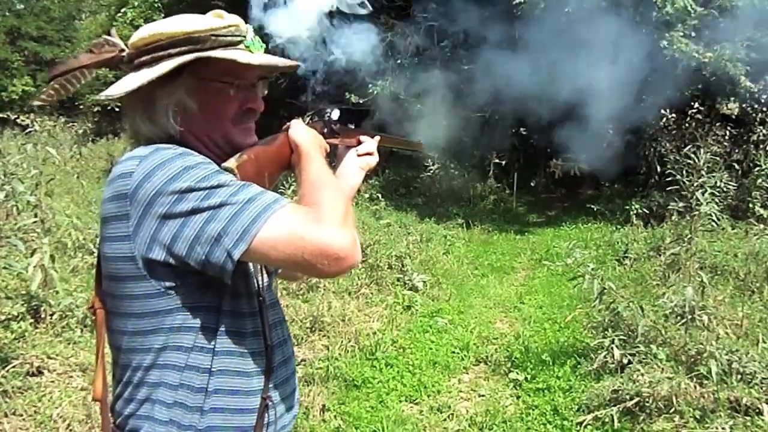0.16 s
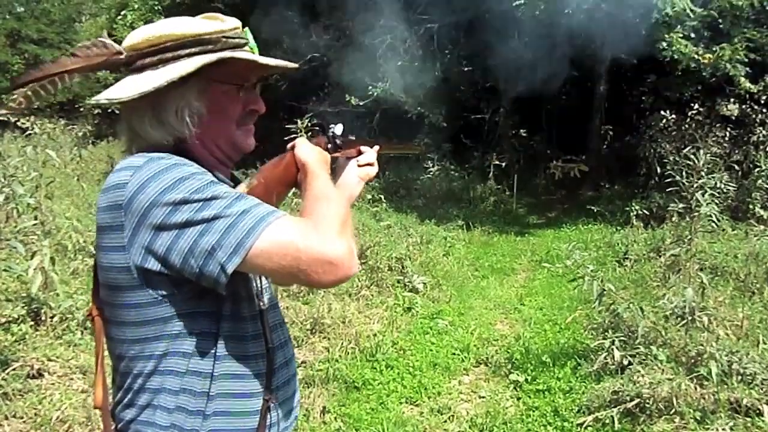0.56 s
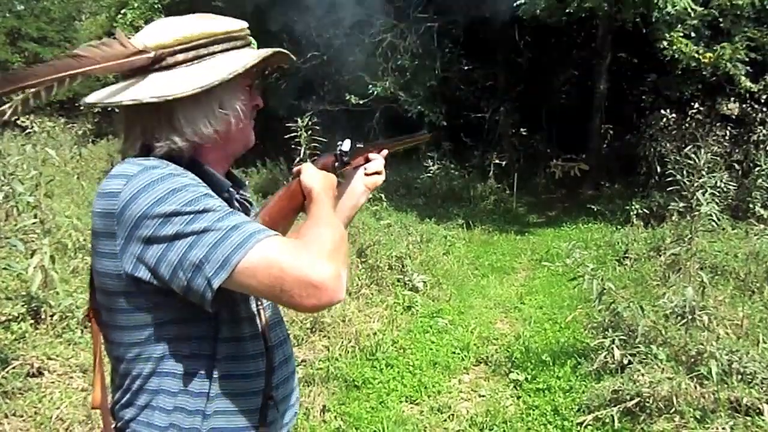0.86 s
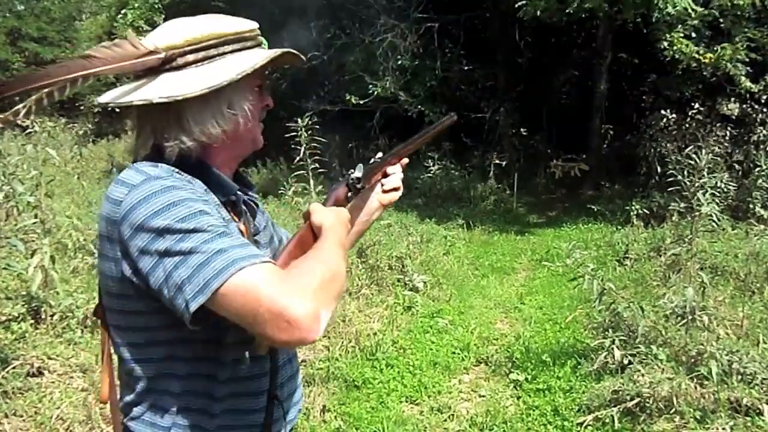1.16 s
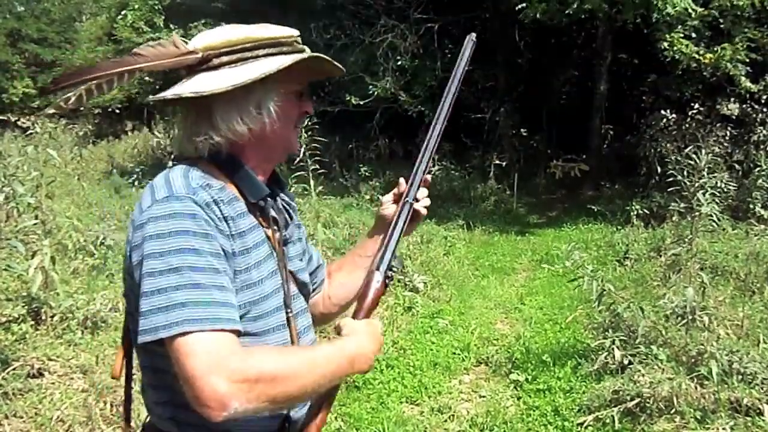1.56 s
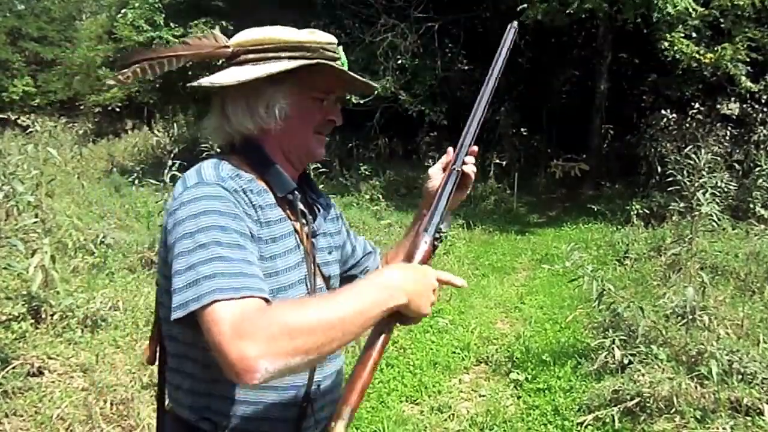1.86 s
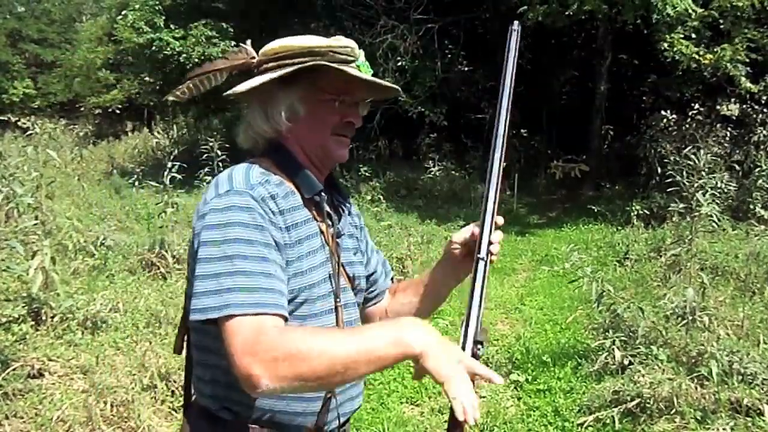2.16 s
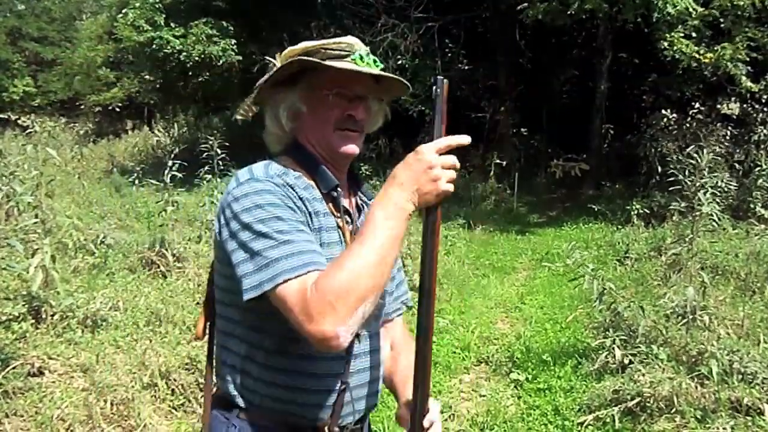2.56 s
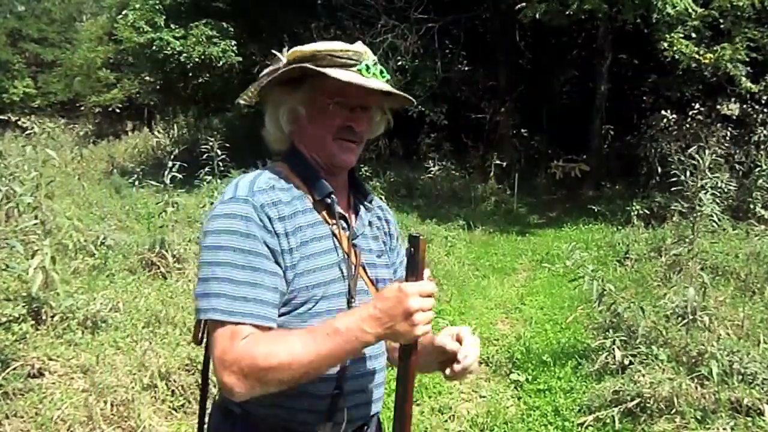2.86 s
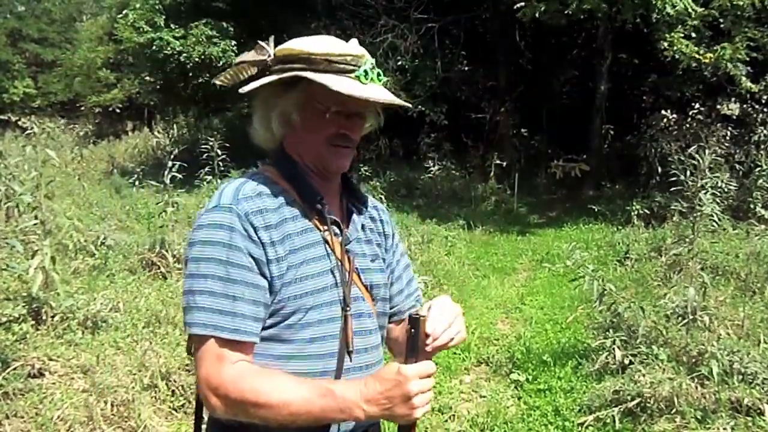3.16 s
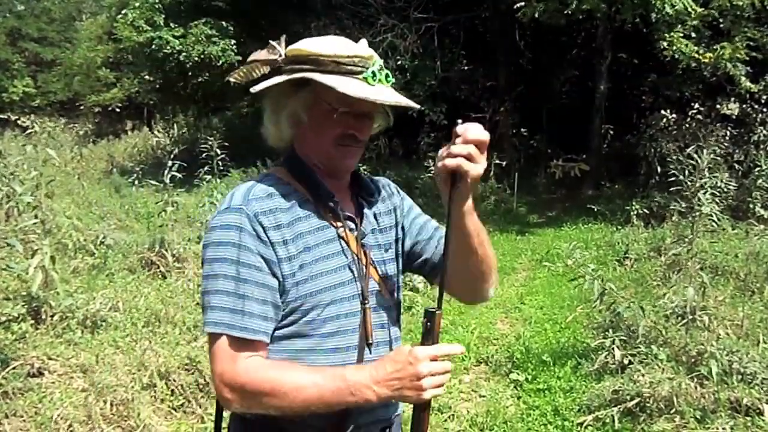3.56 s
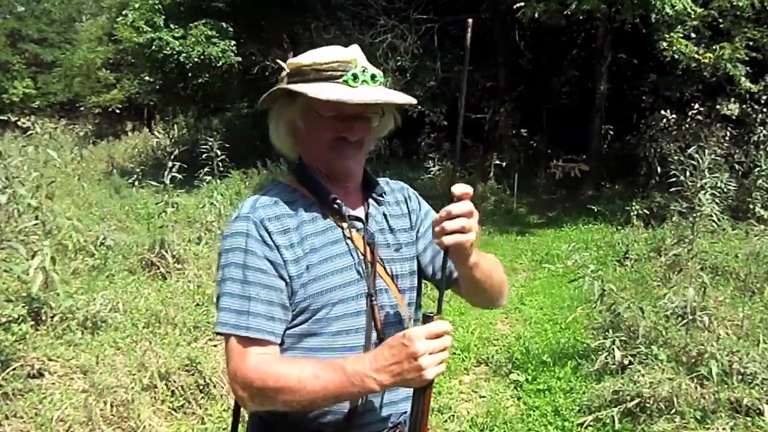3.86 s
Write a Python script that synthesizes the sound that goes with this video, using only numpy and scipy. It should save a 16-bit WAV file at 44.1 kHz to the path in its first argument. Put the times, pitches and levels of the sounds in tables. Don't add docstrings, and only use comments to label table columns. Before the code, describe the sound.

At 0 s a flintlock rifle blast hits at full force, its brief low thump overlaid by dense, bright reflections and hard slaps from nearby trunks within the first 0.1-0.3 s. The hissing leaf scatter falls quickly, while a softer rolling echo from deep woods fades until about 1.5 s. Beneath is low field air and distant rumble, with steady, thin high cricket chirr and wide insect buzzes, some throbbing rapidly around 0.6 and 2.1-2.5 s. A faint tick comes at 1.26 s, a clear lock click at 1.47 s, then small wooden knocks near 2.3 and 2.6 s. From 2.3 s the background gradually swells as camera gain recovers. Cloth rubs from 2.8 to 3.2 s. A tiny squeak at 3.25 s leads into clustered knocks and bright, gritty ramrod scraping at 3.34-3.72 s, with a sharp click at 3.70 s and a softer pull from 3.88 s.

```python
import sys
import numpy as np
from scipy import signal
from scipy.io import wavfile
from scipy.ndimage import uniform_filter1d

SR = 44100
rng = np.random.default_rng(int(sys.argv[2]) if len(sys.argv) > 2 else 0)


def field_ratio(decibels):
    return 10 ** (np.asarray(decibels, dtype=float) / 20)


def dump_mix(stems):
    frames = np.atleast_2d(stems).T
    limited = np.clip(frames, -1, 1)
    pcm = np.round(limited * 32767).astype(np.int16)
    wavfile.write(sys.argv[1], SR, pcm)


N = 177326

# (frequency [Hz], density [dB per Hz])
AIR_SPECTRUM = [(12, -34.5), (20, 1.5), (45, -5.5), (97, -3.5), (129, -2.5), (156, -11.5), (283, -13),
                (490, -18.5), (652, -21.5), (1370, -30), (5800, -29.5), (7800, -46), (13200, -120)]
AIR_DB = -59.5

# (centre [Hz], width [Hz], level [dB])
CRICKET_WINGS = [(7208, 660, 0.5), (7550, 500, 0), (7830, 370, -6)]
CRICKETS_DB = -56
# (frequency [Hz], density [dB per Hz])
BUZZ_SPECTRUM = [(5000, -43.5), (8600, -11), (10000, -10.5), (11200, -5.5), (12400, -3), (13500, -3.5),
                 (14500, -6.5)]
BUZZ_CROWD_DB, BUZZ_EDGE_DB_PER_S, THROB_HZ = -58, 90, 69
# (start [s], length [s], level [dB])
BUZZ_SWELLS = [
    (0, 0.35, -54.5),
    (.85, 0.21, -57.5),
    (1.55, 0.28, -60),
    (2.65, 1, -59),
    (3.55, 0.094, -58),
]
# (start [s], length [s], level [dB])
THROB_BOUTS = [
    (0.546, 0.19, -59),
    (2.05, 0.48, -61),
]

# (time [s], peak [dB], ring [Hz], wood [dB], metal [dB]), before the gain
KNOCKS = [(1.2552, -44, 3330, -21, 10), (1.4747, -25, 2750, -5.5, -6), (2.2724, -46.5, 1390, 14, -1),
          (2.6162, -49.5, 1000, -4, -1), (2.649, -45, 2460, 19, -3), (3.184, -55, 2000, -6, -7),
          (3.3360, -39.5, 2420, -15, -4.5), (3.3555, -35, 1800, -6, 2), (3.3986, -44.5, 2540, 1, -12),
          (3.4720, -38.5, 3000, 7.5, -9.5), (3.509, -53.5, 1110, -5, -11), (3.5724, -58, 2300, -6, 2),
          (3.7043, -33, 3000, -8, 3), (3.8787, -46, 1070, -7, 0), (3.939, -53.5, 2500, -8, -2)]
# (centre [Hz], width [Hz], level [dB])
BODY_MODES = [(1000, 720, -8), (1950, 240, -7), (4930, 4700, -3.5), (8000, 1100, 3.5), (11850, 3200, 5.5)]
RING_T60_MS = 3.8
# (delay [s], level [dB])
GROUND_ECHO = (.0038, -9)
# (time [s], length [s], modes (centre [Hz], width [Hz], level [dB]))
ROD_SQUEAK = (3.252, 0.035, [(5550, 160, -58), (3800, 300, -72), (9560, 300, -60)])
# (frequency [Hz], density [dB])
CLOTH_SPECTRUM = [(300, -24), (700, -6), (1600, -4), (1880, 0), (2100, -5), (2550, 0), (3000, -10.5),
                  (4000, -3.5), (6000, -6.5), (9000, -26)]
# (start [s], length [s], level [dB])
CLOTH_RUBS = [
    (.9, 0.2, -72),
    (2.62, .03, -69),
    (2.82, 0.378, -67.5),
    (3.3, 0.18, -68),
]
RUB_RISE_DB_PER_S, RUB_FALL_DB_PER_S = 250, 200
# (frequency [Hz], density [dB])
PIPE_SPECTRUM = [(400, -18), (1000, -5), (2300, -3), (3400, 0.5), (4400, 0.5), (6500, 4), (9000, 1.5),
                 (13000, -6), (14500, -29)]
# (start [s], length [s], level [dB])
ROD_PULLS = [
    (3.335, .38, -58.5),
    (3.88, .2, -65),
]
# (start [s], length [s], level [dB])
ROD_CATCHES = [
    (3.336, 0.004, -57.5),
    (3.355, 0.0038, -56),
    (3.395, .02, -56.5),
    (3.576, .06, -57.5),
    (3.701, .012, -57.5),
    (3.885, 0.016, -58),
    (3.98, .05, -59),
]
ROD_RISE_DB_PER_S, ROD_FALL_DB_PER_S = 900, 700

# (frequency [Hz], start [dB], T60 [s])
LEAF_SCATTER = [(98, -15.5, 0.17), (400, -24, 0.16), (791, -24.5, 0.14), (1500, -26, 0.47),
                (3000, -23.5, 0.69), (4860, -21, 0.53), (6960, -17.5, 0.52), (10000, -18.5, 0.46),
                (14000, -15.5, 0.29)]
# (frequency [Hz], start [dB], T60 [s])
WOOD_SCATTER = [(101, -36, 2.33), (300, -35.5, 0.94), (898, -28.5, 1.22), (1233, -38.5, 1.58),
                (1500, -31.5, 1.6), (1814, -40, 1.4), (2600, -28, 1.05), (4040, -35, 1.16),
                (6000, -36.5, 1.14), (9500, -34, 0.7), (13900, -50, 0.39)]
# (time [s], peak [dB], centre [Hz], width [Hz], smear [ms])
TRUNK_ECHOES = [(.003, -20, 403, 400, 3.3), (0.02, -21, 450, 497, 4.1), (0.0234, -9, 1850, 2500, 1.6),
                (0.0837, -19, 1500, 2560, 5.3), (.090, -23, 1446, 706, 10.4),
                (0.1154, -29, 1300, 1614, 2.2), (.165, -31, 1200, 2016, 5.4),
                (0.218, -40.5, 1500, 2060, 45), (.25, -43, 3800, 500, 7.3), (0.304, -39, 10800, 6000, 7.8),
                (.315, -38, 10000, 6000, 5.8), (0.524, -56, 8950, 3000, 8.8)]
# (dip [dB], dip time [s], rebound [dB], rebound time [s])
SLOW_SWING = (-28, .006, -30, .024)
# (frequency [Hz], level [dB], T60 [s])
BLAST_THUMP = (165, -32, .06)
THICK_DB, THIN_DB, REACH_S = 10.5, 0, 0.19
# (delay [s], half depth [s], level [dB], extra bass level [dB], bass limit [Hz])
CLEARING_GAP = (.064, .014, -3.5, -7., 2500)

HOLD_S, RECOVER_DB, RECOVER_S = 2.298, 13.5, 0.72
INPUT_CEILING = .55


def evened(x):
    return x / np.sqrt(np.mean(x ** 2) + 1e-20)


def read(points, hz, column=1):
    table = np.transpose(points)
    return np.interp(np.log(hz + 1), np.log(table[0] + 1), table[column])


def add(mix, start_s, sound):
    part = mix[round(start_s * SR):][:len(sound)]
    part += sound[:len(part)]


def resonate(x, hz, width_hz):
    pole = np.exp((2j * hz - width_hz) * np.pi / SR)
    return 2 * signal.lfilter([1 - abs(pole)], [1, -pole], x + 0j).real


def resonate_twice(x, hz, width_hz, second_width_hz):
    return resonate(resonate(x, hz, width_hz), hz, second_width_hz)


def noise(field_db, size, patchy_db):
    hop = size // 4
    hz = np.fft.rfftfreq(size, 1 / SR)[:, None]
    t = np.arange(N // hop + 5) * hop / SR
    real, imag, patches = rng.standard_normal((len(t), len(hz), 3)).T
    patches = uniform_filter1d(patches, size=size // 64, axis=0)
    patches = evened(uniform_filter1d(patches, size=3000 // hop, axis=1))
    z = (real + 1j * imag) * field_ratio(field_db(hz, t) + patchy_db * patches)
    return signal.istft(z, nperseg=size, noverlap=size - hop)[1][:N]


def coloured(points, size, patchy_db):
    return evened(noise(lambda hz, t: read(points, hz), size=size, patchy_db=patchy_db))


def grit(per_s, spread_db, ms):
    size = field_ratio(spread_db * np.minimum(rng.exponential(1, N), 4))
    size = size * (rng.random(N) < per_s / SR)
    grain = np.exp(-np.arange(600) / SR * 1000 / ms)
    power = signal.oaconvolve(size ** 2, grain)[:N].clip(0)
    return evened(np.sqrt(power + 1e-9))


def strokes(rows, rise_db_per_s, fall_db_per_s):
    t = np.arange(N) / SR
    power = np.zeros(N)
    for start_s, length_s, db in rows:
        rise_db = rise_db_per_s * (start_s - t).clip(0)
        fall_db = fall_db_per_s * (t - start_s - length_s).clip(0)
        power += field_ratio(db - rise_db - fall_db) ** 2
    return np.sqrt(power)


def field_air():
    return field_ratio(AIR_DB) * coloured(AIR_SPECTRUM, size=2048, patchy_db=1.0)


def insects():
    clicks = rng.standard_normal(N) * grit(per_s=2500, spread_db=2.5, ms=2.)
    chorus = sum(field_ratio(db) * resonate_twice(clicks, hz, width, width) for hz, width, db in CRICKET_WINGS)
    throb = evened((1 + np.cos(2 * np.pi * (THROB_HZ * np.arange(N) / SR - .1))) ** 1.4)
    swells = strokes(BUZZ_SWELLS, BUZZ_EDGE_DB_PER_S, BUZZ_EDGE_DB_PER_S)
    bouts = strokes(THROB_BOUTS, BUZZ_EDGE_DB_PER_S, BUZZ_EDGE_DB_PER_S)
    buzz = coloured(BUZZ_SPECTRUM, size=256, patchy_db=1.5) * grit(per_s=4000, spread_db=2., ms=2.)
    buzz = buzz * np.sqrt(field_ratio(BUZZ_CROWD_DB) ** 2 + swells ** 2 + (bouts * throb) ** 2)
    return field_ratio(CRICKETS_DB) * evened(chorus) + buzz


def knocks():
    out, t = np.zeros(N), np.arange(2000) / SR
    high_pass = signal.butter(2, 650, 'high', fs=SR)
    for start_s, peak_db, ring_hz, wood_db, metal_db in KNOCKS:
        chatter = rng.standard_normal(2000)
        decay = .12 * field_ratio(-60000 * t / RING_T60_MS) + .035 * np.exp(-t / .007)
        blow = np.exp(-((t - .0003) / .00004) ** 2) + chatter * decay
        knock = 2 * resonate_twice(blow, ring_hz, 2200 / RING_T60_MS, 1800)
        for hz, width, db in BODY_MODES:
            material_db = metal_db if hz > 3000 else wood_db
            knock = knock + field_ratio(db + material_db) * resonate_twice(blow, hz, width, 2 * width)
        knock = signal.lfilter(*high_pass, knock)
        add(out, start_s - .0003, field_ratio(peak_db) * knock / abs(knock).max())
    return out


def squeak():
    out, t = np.zeros(N), np.arange(2000) / SR
    start_s, length_s, modes = ROD_SQUEAK
    slip = np.sin(np.pi * np.minimum(t / length_s, 1)) ** 2
    for hz, width, db in modes:
        rub = rng.standard_normal(2000)
        add(out, start_s, field_ratio(db) * slip * evened(resonate_twice(rub, hz, width, width)))
    return out


def cloth():
    rub = coloured(CLOTH_SPECTRUM, size=1024, patchy_db=2.0) * grit(per_s=890, spread_db=-9.0, ms=9.5)
    return strokes(CLOTH_RUBS, RUB_RISE_DB_PER_S, RUB_FALL_DB_PER_S) * rub


def sliding_rod():
    scrape = coloured(PIPE_SPECTRUM, size=256, patchy_db=-1.5) * grit(per_s=660, spread_db=-4.5, ms=3.0)
    return strokes(ROD_PULLS + ROD_CATCHES, ROD_RISE_DB_PER_S, ROD_FALL_DB_PER_S) * scrape


def handling():
    out = knocks() + squeak()
    delay_s, echo_db = GROUND_ECHO
    add(out, delay_s, field_ratio(echo_db) * out.copy())
    return out + cloth() + sliding_rod()


def thicket(hz, t):
    gap_s, depth_s, db, bass_db, below_hz = CLEARING_GAP
    gap_db = db + bass_db / (1 + (hz / below_hz) ** 4)
    gap_db = gap_db * np.exp(-((t - gap_s) / depth_s) ** 2)
    return THIN_DB + (THICK_DB - THIN_DB) * np.exp(-(t / REACH_S) ** 2) + gap_db


def dying(rows, hz, t):
    return read(rows, hz) - 60 * t / read(rows, hz, column=2) - 20


def scattered_blast():
    near = noise(lambda hz, t: dying(LEAF_SCATTER, hz, t) + thicket(hz, t), size=256, patchy_db=.8)
    near = near * np.roll(grit(per_s=2500, spread_db=1.8, ms=1.5), -600)
    return near + noise(lambda hz, t: dying(WOOD_SCATTER, hz, t), size=512, patchy_db=1.)


def trunk_echoes():
    out, t = np.zeros(N), np.arange(4000) / SR
    for start_s, peak_db, hz, width, smear_ms in TRUNK_ECHOES:
        scatter = rng.standard_normal(4000) * np.exp(-1000 * t / smear_ms)
        echo = resonate_twice(scatter, hz, width, width * 2)
        add(out, start_s, field_ratio(peak_db) * echo / abs(echo).max())
    return out


def hump(u):
    return u ** 2 * np.exp(2 - 2 * u)


def slow_swing():
    out, t = np.zeros(N), np.arange(4000) / SR
    dip_db, dip_s, rebound_db, rebound_s = SLOW_SWING
    add(out, 0, field_ratio(rebound_db) * hump(t / rebound_s) - field_ratio(dip_db) * hump(t / dip_s))
    thump_hz, thump_db, t60_s = BLAST_THUMP
    wobble = np.cos(2 * np.pi * thump_hz * t) - np.exp(-t / 0.0018)
    add(out, 0, field_ratio(thump_db - 60 * t / t60_s) * wobble)
    return out


def report():
    return scattered_blast() + trunk_echoes() + slow_swing()


def scene():
    return (field_air() + insects() + handling() + report())[None]


def top_cut(x):
    return signal.sosfilt(signal.butter(12, 14010, fs=SR, output="sos"), x)


def record(dry):
    since_hold_s = (np.arange(N) / SR - HOLD_S).clip(0)
    gain_db = RECOVER_DB * (1 - np.exp(-since_hold_s / RECOVER_S))
    squeezed = INPUT_CEILING * np.tanh(dry * field_ratio(gain_db) / INPUT_CEILING)
    return top_cut(squeezed)


dry = scene()
out = record(dry)
dump_mix(out)
```